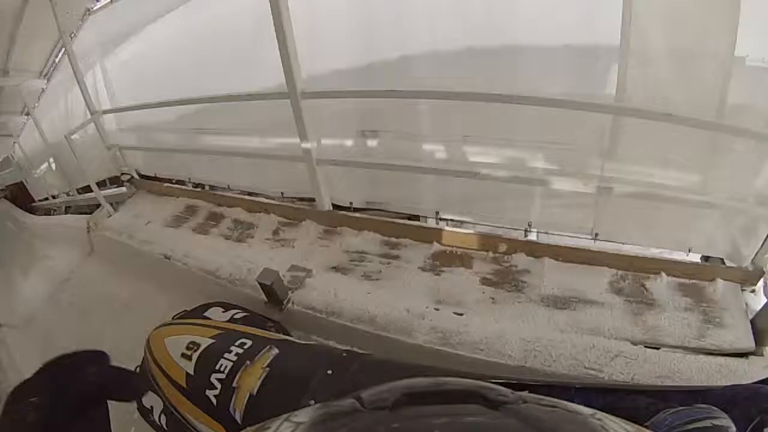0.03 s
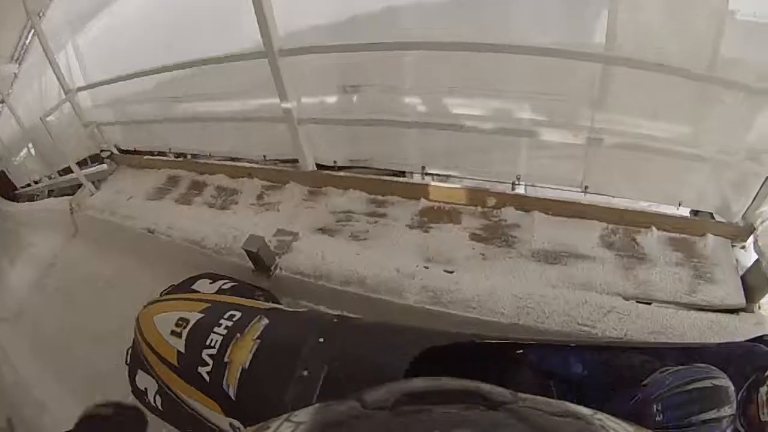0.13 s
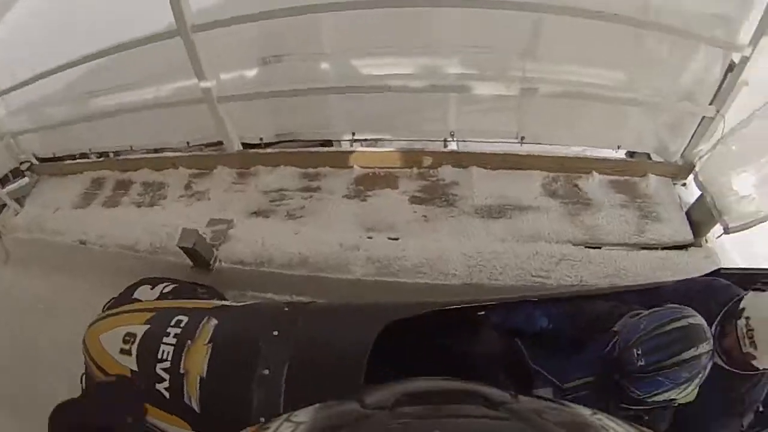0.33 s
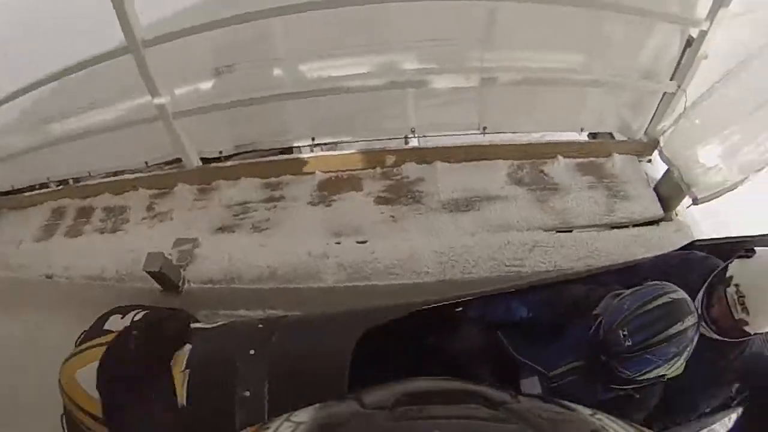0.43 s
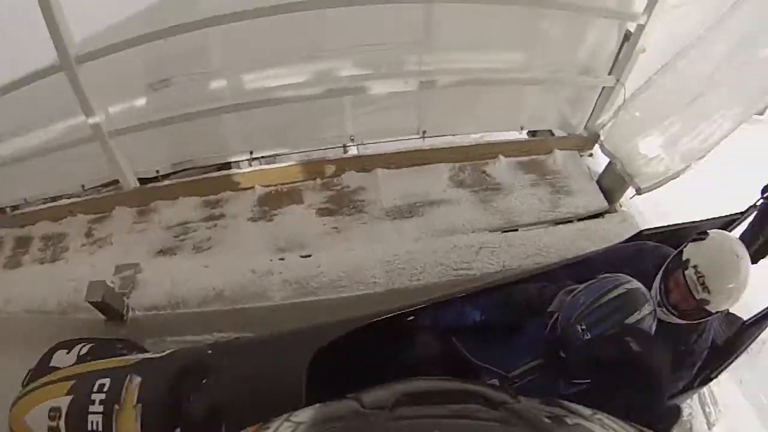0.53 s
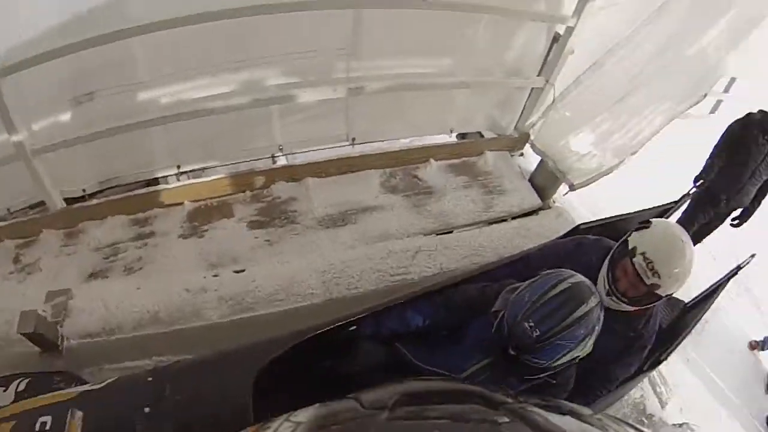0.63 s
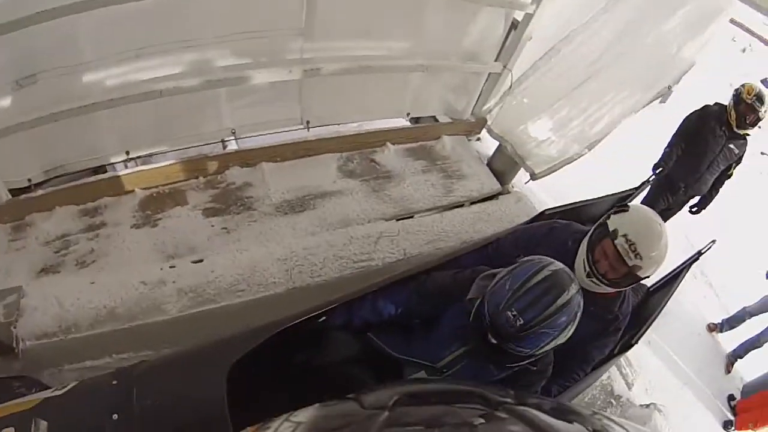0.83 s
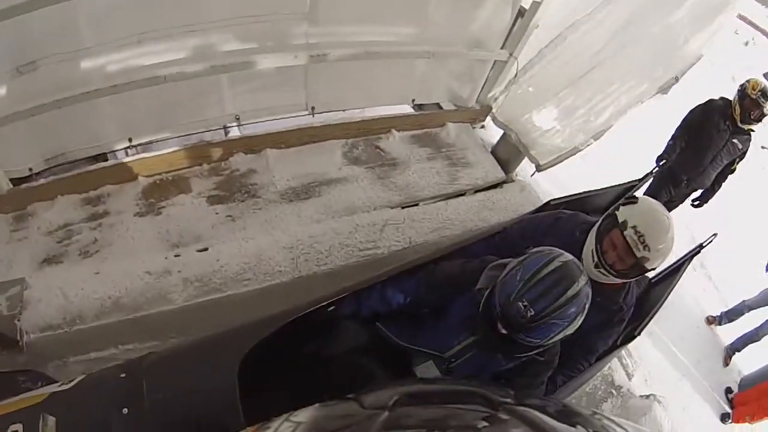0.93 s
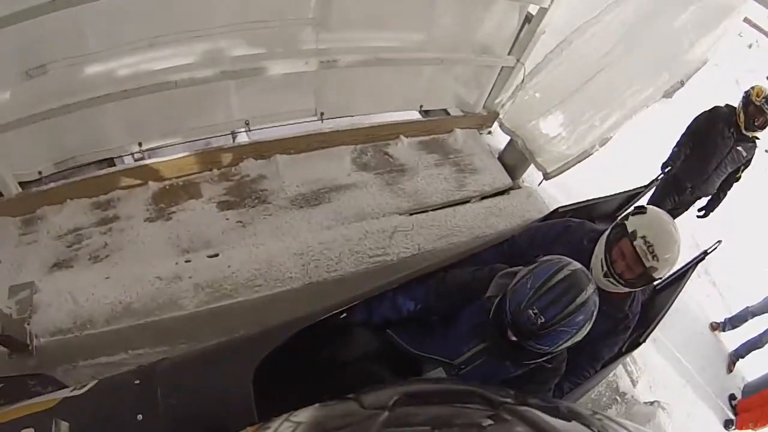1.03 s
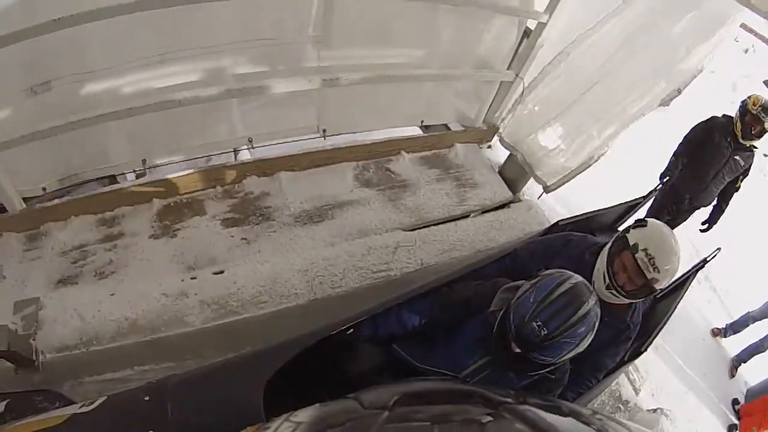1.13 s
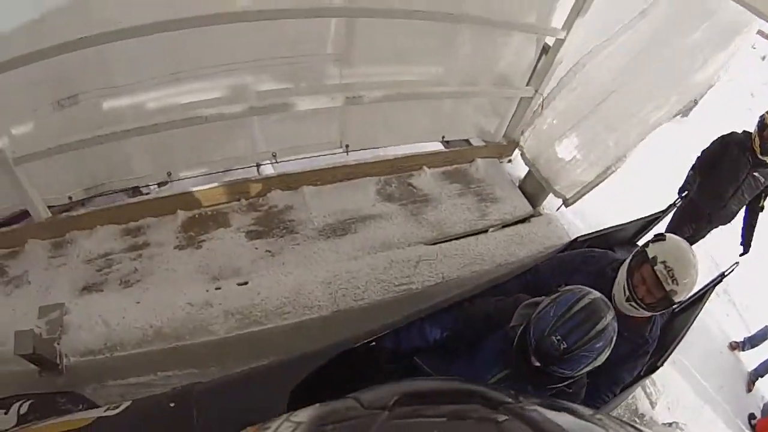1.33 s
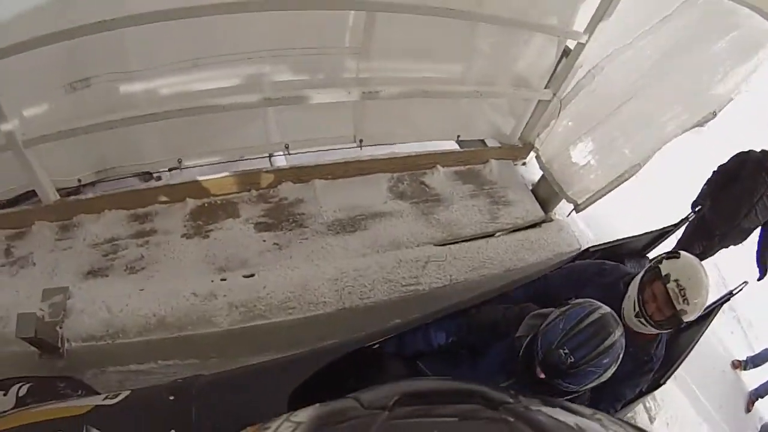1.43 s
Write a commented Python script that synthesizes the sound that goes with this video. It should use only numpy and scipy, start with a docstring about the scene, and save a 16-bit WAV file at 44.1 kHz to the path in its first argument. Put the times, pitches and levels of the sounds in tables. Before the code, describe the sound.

A bobsled slides slowly on ice, heard close on board. After near quiet, a hard knock comes at 0.11 s, then the loudest cluster of cracks and deep hollow boom at 0.2-0.25 s. Smaller bumps and rattles follow at 0.38-0.43 s. Faint grainy hiss, low rumble and tiny scuffs continue until a crunchy scrape at 1.18 s scatters ice chips; a soft bump lands at 1.42 s. Echo is slight.

```python
"""Slow bobsled on ice

A bobsled slides slowly along an ice track. Soft blows make its hollow shell boom as fading tones,
while hard fittings knock, ring and rattle as sharp clicks and noise bursts with a faint echo.
The runners hiss as grainy noise over a low rumble, then bite the ice in one short crunchy scrape
with a patter of ice chips, and the sled bumps once more."""
import sys
import numpy as np
from scipy import signal
from scipy.fft import rfft, irfft
from scipy.io import wavfile
from scipy.ndimage import uniform_filter1d

SR = 44100
rng = np.random.default_rng(int(sys.argv[2]) if len(sys.argv) > 2 else 0)


def materialize(psi):
    """Save the field psi as 16-bit PCM at rate SR to the path in sys.argv[1].

    A 1-D psi becomes a single channel; in a 2-D psi each row is a channel.
    """
    bounded = np.clip(np.atleast_2d(psi).T, -1, 1)
    quanta = np.round(bounded * 32767).astype(np.int16)
    wavfile.write(sys.argv[1], SR, quanta)


N = 66150  # samples: 1.5 seconds

# Ice grains: clicks per second, spread of click size in dB, and powder noise relative to the clicks
GLIDE_GRAINS_PER_S, GLIDE_SPREAD_DB, GLIDE_DUST = 1500, 1, 1.07
SCRAPE_SPREAD_DB, SCRAPE_DUST = 3, 0.64
SCRAPE_S = 1.175  # start of the scrape and of its spray


def amp(db):
    """Turns decibels into gain."""
    return 10 ** (np.asarray(db) / 20)


def unit(x):
    """Scales a signal to an rms (average strength) of 1."""
    return x / np.sqrt(np.mean(x ** 2) + 1e-20)


def read(points, hz):
    """Reads a table of (Hz, value) between its points, along log frequency."""
    f, value = np.transpose(points)
    return np.interp(np.log(hz + 1), np.log(f + 1), value)


def fade(t, t60):
    """Stays at 1 until t = 0, then dies away by 60 dB in t60 seconds."""
    return np.exp(-np.log(1000) * np.maximum(t, 0) / t60)


def add(mix, s, sound):
    """Mixes a sound in at s seconds, cut off where the mix ends."""
    part = mix[max(round(s * SR), 0):][:len(sound)]
    part += sound[:len(part)]


def response(points, size=4096):
    """Makes a click of energy 1 with the given spectrum, packed towards its start (minimum phase)."""
    hz = abs(np.fft.fftfreq(size, 1 / SR))
    log_gain = np.log(amp(read(points, hz)))
    spectrum = np.exp(np.conj(signal.hilbert(log_gain)))
    h = np.fft.ifft(spectrum).real[:size // 2]
    return h / np.linalg.norm(h)


def coloured(x, points):
    """Filters a signal of N samples by a (Hz, dB) table and scales it to rms 1."""
    gain = amp(read(points, np.fft.rfftfreq(N, 1 / SR)))
    return unit(irfft(rfft(x) * gain, N))


def chatter(t, rise_s, t60):
    """A swelling and dying noise burst of energy 1, for many tiny contacts."""
    level = np.minimum(t / rise_s, 1) * fade(t - rise_s, t60)
    burst = rng.standard_normal(len(t)) * level
    return burst / np.linalg.norm(burst)


def ice_grains(per_s, spread_db, dust):
    """Ice breaking under steel: random clicks of uneven size in fine powder noise."""
    size = amp(spread_db * np.minimum(rng.exponential(1, N), 4))
    size = size * rng.choice([-1, 1], N)
    clicks = unit(size * (rng.random(N) < per_s / SR))
    return clicks + dust * rng.standard_normal(N)


def rumble():
    """Low rumble of the shell: dark noise whose level wanders."""
    # Each row: frequency in Hz, strength in dB.
    rumble_colour = [(8, 4), (16, 4.5), (30, 2), (55, -6), (85, -13), (115, 1), (145, -5), (200, -15.5),
                     (260, -17), (330, -25.5), (450, -26.5), (900, -45.5)]
    # Each row: time in seconds, level in dB.
    rumble_level = [(0, -50), (.45, -47.5), (.7, -53.5), (.8, -48), (.88, -53.5), (1.0, -48.5), (1.1, -52),
                    (1.2, -45.5), (1.35, -47.5), (1.5, -48.5)]
    shaking = amp(np.interp(np.arange(N) / SR, *np.transpose(rumble_level)))
    return shaking * coloured(rng.standard_normal(N), rumble_colour)


def glide():
    """Faint hiss of the runners: ice grains with random strong and weak patches, as on uneven ice."""
    # Level of the hiss. Each row: time in seconds, level in dB.
    glide_level = [(0, -59.5), (0.102, -62.5), (.5, -61.5), (.57, -57), (.62, -59.5), (.69, -59),
                   (.78, -55.5), (.83, -58.5), (0.889, -59.5), (.97, -55.5), (1.02, -59.5), (1.05, -58.5),
                   (1.15, -58.5), (1.328, -54), (1.4, -61.5), (1.46, -54.5), (1.5, -59)]
    # Each row: frequency in Hz, strength in dB.
    glide_colour = [(180, -22.5), (380, -5), (520, -4), (750, -8), (1140, -9), (1500, -3.5), (1850, 1.5),
                    (2120, -6), (2420, -0.5), (3200, -5.5), (4400, -14), (5900, -12.5), (8000, -23),
                    (12000, -28.5), (13800, -34), (15300, -62)]
    patch_db, patch_s, patch_hz = 3, .04, 700  # typical depth; smoothing in time and in frequency
    grains = ice_grains(GLIDE_GRAINS_PER_S, GLIDE_SPREAD_DB, GLIDE_DUST)
    hz, t, z = signal.stft(grains, SR, nperseg=512)
    patches = rng.standard_normal(z.shape)
    patches = uniform_filter1d(patches, max(round(patch_hz / hz[1]), 1), axis=0)
    patches = unit(uniform_filter1d(patches, max(round(patch_s / t[1]), 1), axis=1))
    patchy = signal.istft(z * amp(patch_db * patches), SR)[1][:N]
    level = amp(np.interp(np.arange(N) / SR, *np.transpose(glide_level)))
    return level * coloured(patchy, glide_colour)


def scuff(length, db, treble_db):
    """A runner rubs over a rough patch: a quick swell of grains that tapers off."""
    # Each row: frequency in Hz, strength in dB.
    scuff_colour = [(300, 1), (1000, -15), (1800, 4.5), (2450, 5), (3700, 0), (4600, -8.5), (6000, -8.5),
                    (8000, -21), (12000, -25), (16000, -45)]
    u = np.arange(0, length, 1 / SR) / length  # runs from 0 to 1
    grains = coloured(ice_grains(GLIDE_GRAINS_PER_S, GLIDE_SPREAD_DB, GLIDE_DUST), scuff_colour)
    grains = coloured(grains, [(3000, 0), (6000, treble_db)])
    swell = np.sin(np.pi * np.sqrt(u))
    return amp(db) * swell * grains[:len(u)]


def spray():
    """Ice chips thrown up by the scrape: a patter of grains that swells and dies away slowly."""
    # Each row: frequency in Hz, strength in dB.
    spray_colour = [(500, -11), (2000, 8), (4000, -8), (6500, 2.5), (8500, -9), (11500, -12.5),
                    (14000, -30), (16000, -32)]
    level_db, rise_s, t60, grains_per_s = -44.5, 0.044, 0.34, 1200
    t = np.arange(N) / SR - SCRAPE_S
    level = np.clip(t / rise_s, 0, 1) * fade(t - rise_s, t60)
    grains = ice_grains(grains_per_s, SCRAPE_SPREAD_DB, SCRAPE_DUST)
    return amp(level_db) * level * coloured(grains, spray_colour)


def scrape():
    """A runner bites the ice: a juddering crunch of grains peaks fast and drags out as the sled lurches."""
    # Each row: frequency in Hz, strength in dB.
    scrape_colour = [(60, -11), (150, 1.5), (260, 0), (400, -10.5), (600, -14.5), (1080, -24), (1500, -3),
                     (2000, -2.5), (2500, 0), (3050, 2), (3500, -6), (4050, 1.5), (4500, -4), (6400, -10.5),
                     (7800, -24.5), (11000, -33), (16000, -65)]
    level_db, rise_s, hold_s, t60, grains_per_s = -29, 0.015, 0.0044, 0.13, 2600
    drag_db, drag_t60 = -5.5, 0.37  # slower tail, relative to the crunch
    judder_db, judder_hz = 1.46, 202  # typical swing of the level, and where its wobble stops being strong
    lurch_s, lurch_db, lurch_hz, lurch_t60 = 1.21, -29.5, 21.6, 0.18
    t = np.arange(N) / SR - SCRAPE_S
    after = t - rise_s - hold_s
    tail = fade(after, t60) + amp(drag_db) * fade(after, drag_t60)
    level = np.sqrt(np.clip(t / rise_s, 0, 1)) * tail
    wobble = coloured(rng.standard_normal(N), [(judder_hz, 0), (2 * judder_hz, -40)])
    judder = amp(judder_db * wobble)
    grains = ice_grains(grains_per_s, SCRAPE_SPREAD_DB, SCRAPE_DUST)
    out = amp(level_db) * level * judder * coloured(grains, scrape_colour)
    u = np.arange(SR // 2) / SR
    lurch = -amp(lurch_db) * np.sin(2 * np.pi * lurch_hz * u) * fade(u, lurch_t60)
    add(out, lurch_s, lurch)
    return out


def track(x):
    """Short diffuse echo from the ice walls and canopy: noise whose treble dies sooner than its bass."""
    # Each row: frequency in Hz, time to die away by 60 dB in seconds.
    echo_t60 = [(200, 0.9), (2000, 0.45), (6000, 0.12), (14000, 0.09)]
    hz, t, z = signal.stft(rng.standard_normal(SR // 2), SR, nperseg=256)
    tail = signal.istft(z * fade(t, read(echo_t60, hz)[:, None]), SR)[1]
    return signal.fftconvolve(x, tail / np.linalg.norm(tail))[:N]


def buzz():
    """Loose fittings go on rattling finely after the hard bumps: noise that dies away."""
    # Each row: start in seconds, level in dB, time to die away by 60 dB in seconds.
    buzzes = [(0.219, -43.5, 0.23), (0.389, -48, 0.19)]
    # Each row: frequency in Hz, strength in dB.
    buzz_colour = [(300, -10), (700, -5.5), (1200, -17), (1800, 3.5), (2700, -5), (3500, -2), (4800, -9),
                   (5900, -3), (7500, -15.5), (12000, -33), (16000, -42)]
    t = np.arange(N) / SR
    level = sum(amp(db) * (t > s) * fade(t - s, t60) for s, db, t60 in buzzes)
    return level * coloured(rng.standard_normal(N), buzz_colour)


def crack():
    """A bright snap: one sharp click and a few milliseconds of splintery chatter."""
    # Each row: frequency in Hz, strength in dB.
    crack_colour = [(200, 15.5), (450, -4.5), (700, -29), (1400, 3), (2700, -1.5), (3600, -7.5),
                    (5600, -6.5), (7100, -11.5), (8500, -3), (10000, -8), (12000, -6.5), (14000, -26),
                    (16000, -39)]
    level_db, chatter_db = 6, 0.5  # the chatter is relative to the click
    t = np.arange(SR // 10) / SR
    force = amp(chatter_db) * chatter(t, rise_s=0.00069, t60=0.0065)
    force[0] += 1
    return amp(level_db) * signal.fftconvolve(force, response(crack_colour))


def knock(db, treble_db, chatter_db, ring_db):
    """A hard contact, its rebound and chatter travel through the panel and ring the fittings."""
    # Colour of the dull part. Each row: frequency in Hz, strength in dB.
    knock_colour = [(100, -4), (350, -11), (520, -32), (750, -46), (1150, -20), (1600, -1), (2050, -0.5),
                    (2650, -1), (3050, -9), (3400, -15), (4200, -16), (5000, -14), (5900, -7),
                    (6800, -21.5), (8000, -27), (11800, -48.5), (14000, -45), (16000, -58)]
    # Ringing tones. Each row: frequency in Hz, level in dB before ring_db is added,
    # time to die away by 60 dB in seconds.
    fittings = [(925, -51.5, 0.16), (1409, -39.5, .04), (1575, -47, 0.058), (1760, -39, 0.037),
                (1893, -48, 0.099), (2071, -38, 0.12), (2494, -36.5, 0.051), (2590, -47, 0.037),
                (2682, -41, 0.031), (2914, -37, 0.037), (4030, -37, 0.011), (6400, -31, 0.0075)]
    overall_db, rebound_s, rebound_db = 4, 0.003003, -13
    spread_s, spread_hz = 0.0005915, 2020  # travel delay at this frequency
    t = np.arange(SR // 4) / SR
    force = amp(chatter_db) * chatter(t, rise_s=0.0017, t60=0.019)
    force[0] += 1
    add(force, rebound_s, amp(rebound_db) * np.array([.25, .5, .25]))
    body = sum(amp(ring_db + level) * np.sin(2 * np.pi * hz * t) * fade(t, t60)
               for hz, level, t60 in fittings)
    add(body, 0, response(knock_colour))
    hardness = response([(3000, 0), (5000, treble_db)], size=256)
    hardness = hardness / abs(hardness.sum())  # leaves the bass level unchanged
    # Bending waves in the panel: the treble arrives first.
    hz = np.fft.rfftfreq(SR, 1 / SR)
    bending = np.exp(-2j * np.pi * 2 * spread_s * np.sqrt(hz * spread_hz))
    z = rfft(force, SR) * rfft(body, SR) * rfft(hardness, SR) * bending
    return amp(overall_db + db) * irfft(z, SR)[:len(t)]


def bump(boom_db, thud_db, rise_s, upper_db):
    """A soft blow swells the shell's boom and upper tones, with a dull thud and a slow heave."""
    # Upper tones of the shell. Each row: frequency in Hz, level in dB before upper_db is added,
    # time to die away by 60 dB in seconds.
    shell = [(168, -0.5, 0.12), (254, -8, 0.079), (380.8, -1, 0.11), (417, -10.5, 0.042), (502, -16, 0.065)]
    t = np.arange(SR) / SR
    swell = np.sin(np.pi / 2 * np.minimum(t / rise_s, 1))

    def ring(hz, t60):
        """A tone that dies away once the blow has risen."""
        return np.sin(2 * np.pi * hz * t) * fade(t - rise_s, t60)

    boom = ring(114.34, t60=0.26)  # the hollow of the shell
    upper = sum(amp(db) * ring(hz, t60) for hz, db, t60 in shell)
    heave = amp(-14) * ring(31.4, t60=0.18)
    thud = heave - ring(84.4, t60=0.049)
    tones = amp(boom_db) * boom + amp(upper_db) * upper
    return swell * (tones + amp(thud_db) * swell ** 2 * thud)  # the thud swells in later


def scene():
    """Adds up runners on ice, knocks with their echo, and bumps of the shell."""
    # Rubs on rough ice. Each row: start in seconds, length in seconds, level in dB,
    # tilt in dB reached at 6 kHz relative to below 3 kHz.
    scuffs = [(0.65, 0.036, -54, -2), (0.60, 0.25, -61.5, 7), (0.768, 0.038, -53.5, -1),
              (0.904, 0.045, -56.5, 13)]
    # Knocks of the fittings. Each row: start in seconds, level in dB before the overall knock level,
    # tilt in dB reached at 5 kHz relative to below 3 kHz, chatter in dB, ring in dB.
    knocks = [(0.1114, 0.5, -1, -11.5, -2.5), (0.2031, -2.5, -8, -4, 2), (0.2135, 2.5, -13.5, -6.5, 0.5),
              (0.2172, -1.5, -8, 0.5, -4.5), (0.2426, -15, -9.5, 0.5, 4.5), (0.2695, -30, -8, 4, 7.5),
              (0.2960, -29, -8, 2, -3), (0.3029, -20, -4.5, 0, -3), (0.306, -25, -3.5, 2, -8),
              (0.3168, -29.5, -6, 0.5, 9), (0.355, -34.5, -8, -6, -14), (0.3712, -38, 6, -1, -6),
              (0.3820, -29, 6.5, -7, 4), (0.3850, -15, 4, -21, 3), (0.4190, -30, -7, -9, 15),
              (0.423, -20, 1.5, 0.5, 0.5), (0.4348, -21.5, 1.5, -8.5, -4), (0.6473, -36, -5, -8, 5),
              (0.7470, -36, -3, 1, -1)]
    # Bumps of the shell. Each row: start in seconds, boom in dB, dull thud in dB,
    # rise in seconds, upper tones in dB.
    bumps = [(0.1123, -27, -43, 0.00089, -43), (0.2091, -7, -6, 0.024, -31), (0.2450, -20, -43, 0.016, -47),
             (0.3799, -25.5, -22, 0.0097, -51), (0.4129, -26, -42, 0.014, -47),
             (0.5917, -38, -58, 0.008, -67), (0.616, -39, -64, 0.0085, -70),
             (0.647, -51, -69, 0.0055, -53.5), (0.764, -55, -39.5, 0.0084, -63),
             (1.42, -29, -35, 0.0045, -54)]
    crack_s, echo_db = .2175, -30  # the crack comes just after the strongest knock
    ice = rumble() + glide() + spray() + scrape()
    hard, soft = buzz(), np.zeros(N)
    for s, *rub in scuffs:
        add(ice, s, scuff(*rub))
    for s, *blow in knocks:
        add(hard, s, knock(*blow))
    add(hard, crack_s, crack())
    for s, *blow in bumps:
        add(soft, s, bump(*blow))
    return (ice + soft + hard + amp(echo_db) * track(hard))[None]


def record(dry):
    """Clips at full scale, then removes the treble above about 16.5 kHz."""
    low_pass = signal.firwin(511, 16500, window=("kaiser", 9), fs=SR)
    return signal.oaconvolve(np.clip(dry, -1, 1), low_pass[None], "same")


dry = scene()
out = record(dry)
materialize(out)
```